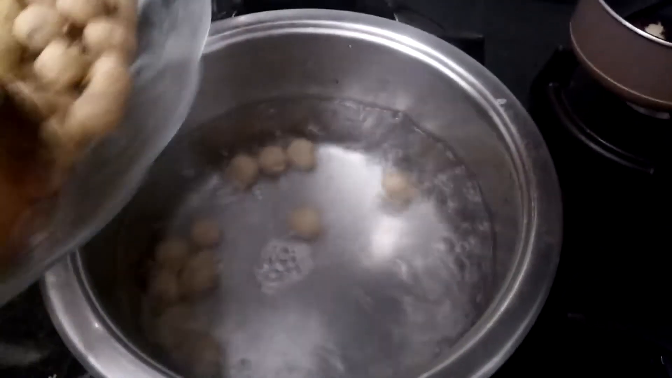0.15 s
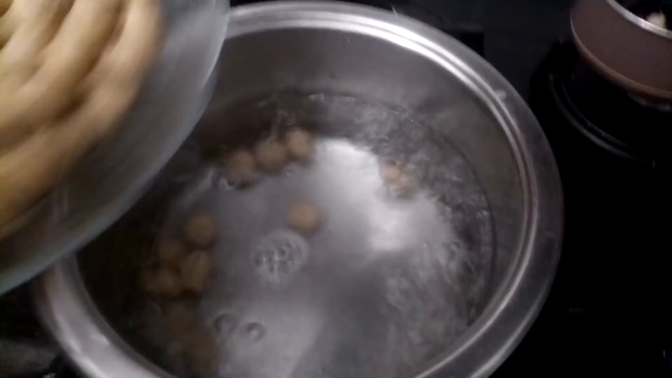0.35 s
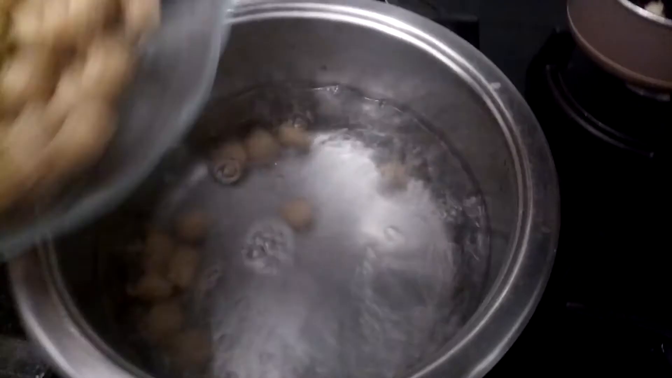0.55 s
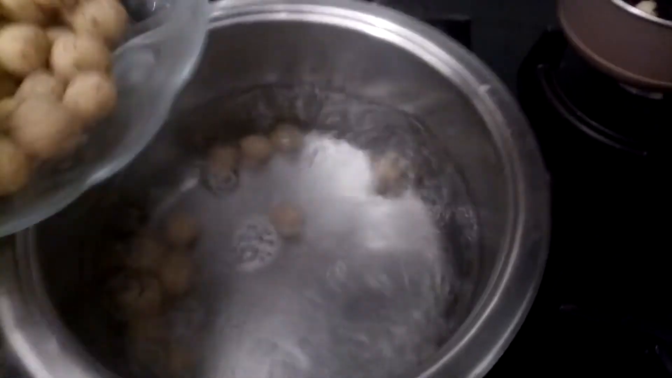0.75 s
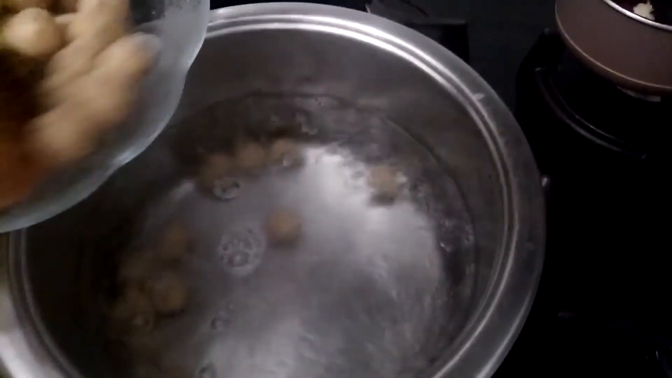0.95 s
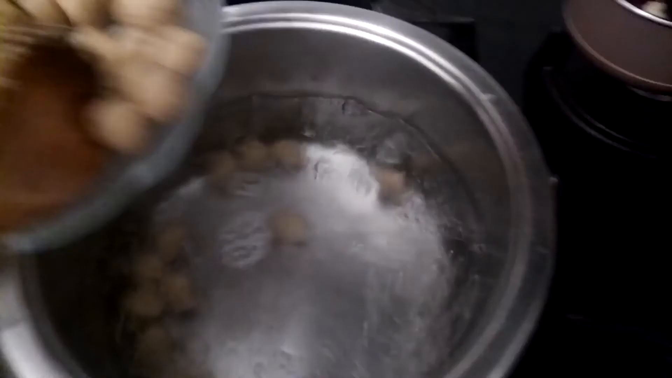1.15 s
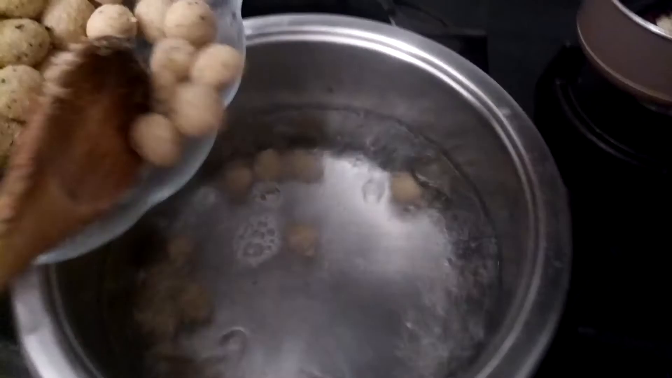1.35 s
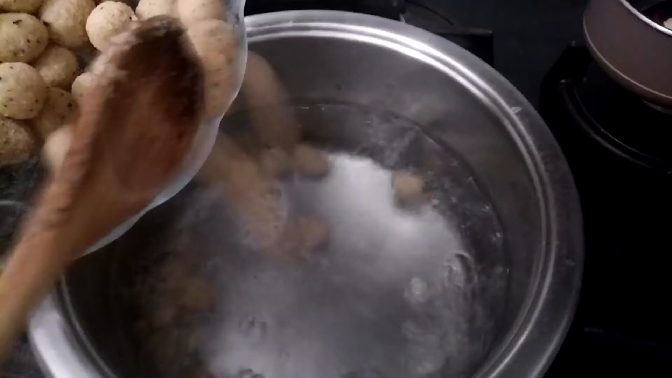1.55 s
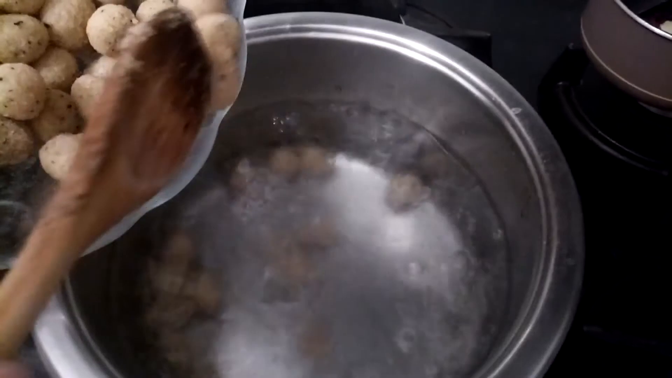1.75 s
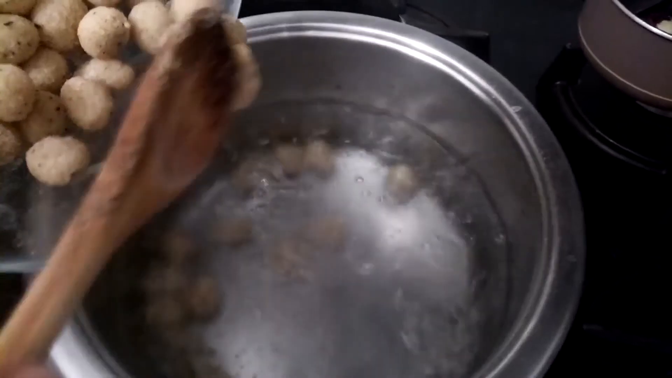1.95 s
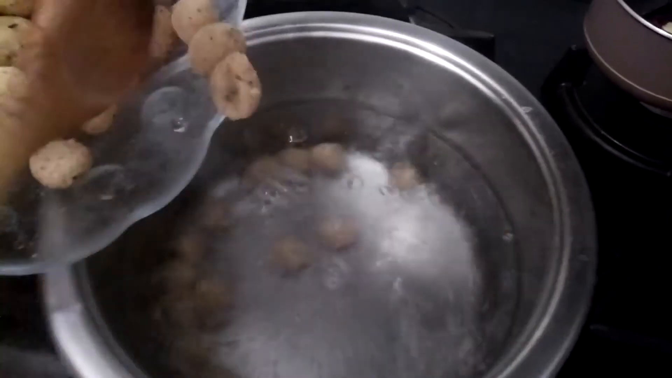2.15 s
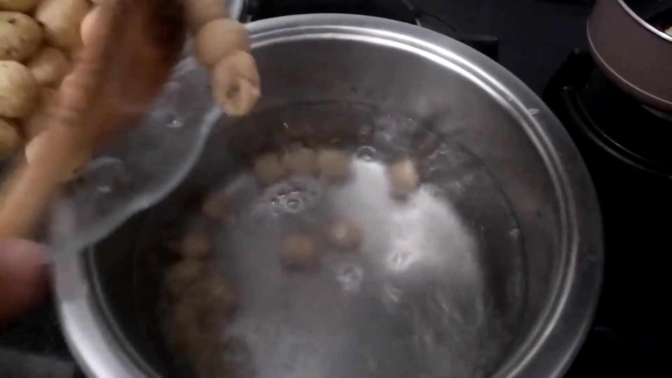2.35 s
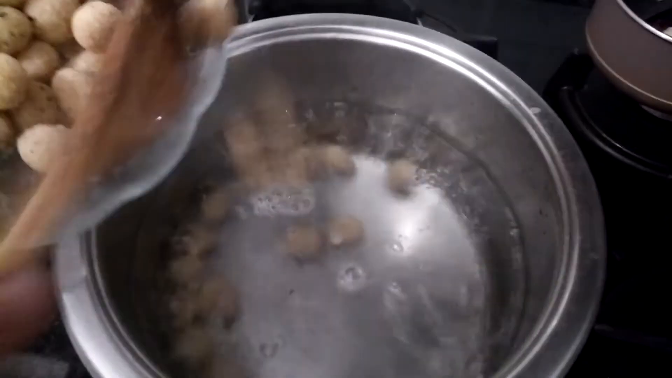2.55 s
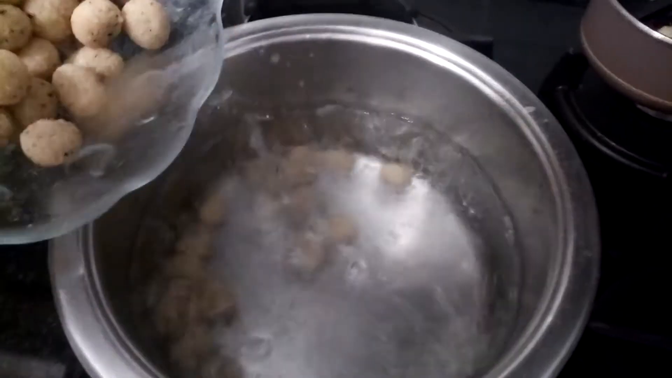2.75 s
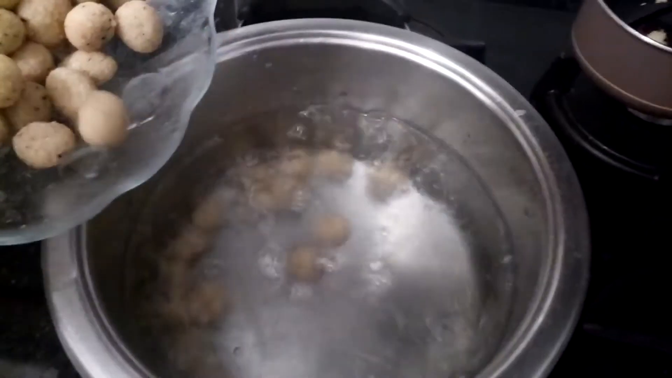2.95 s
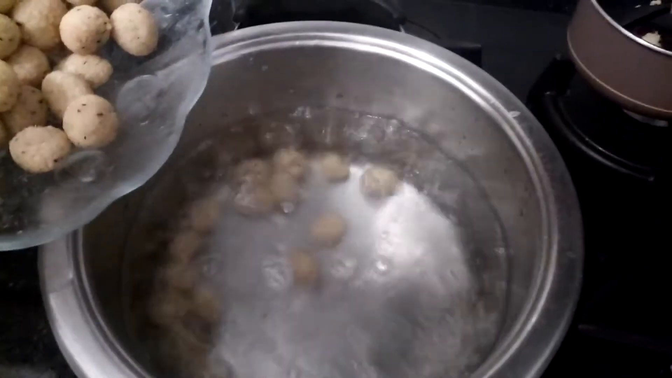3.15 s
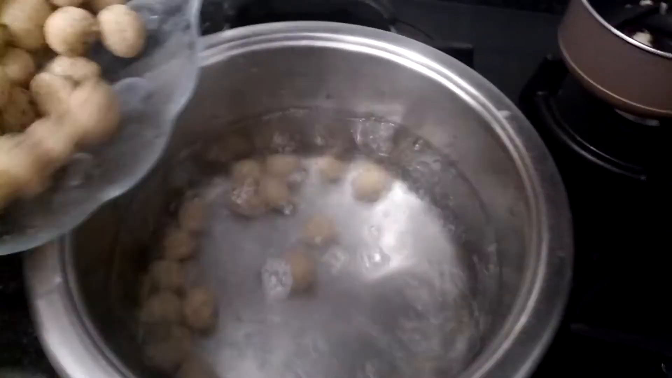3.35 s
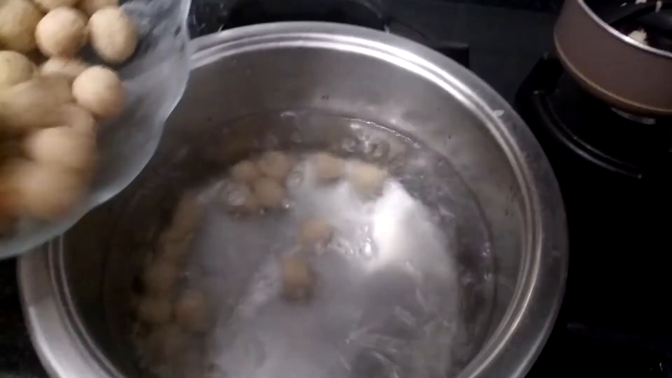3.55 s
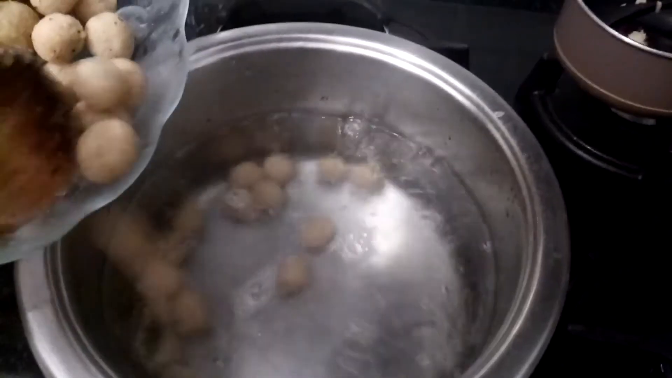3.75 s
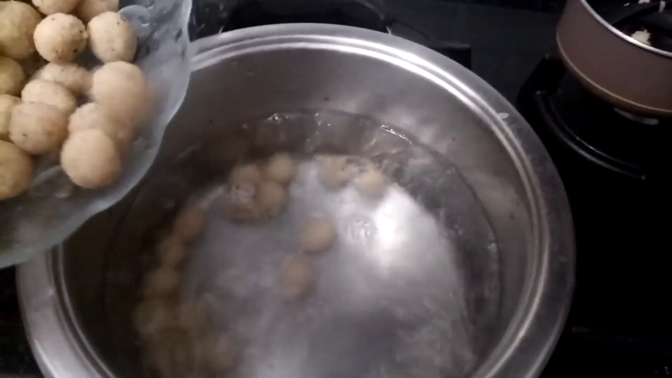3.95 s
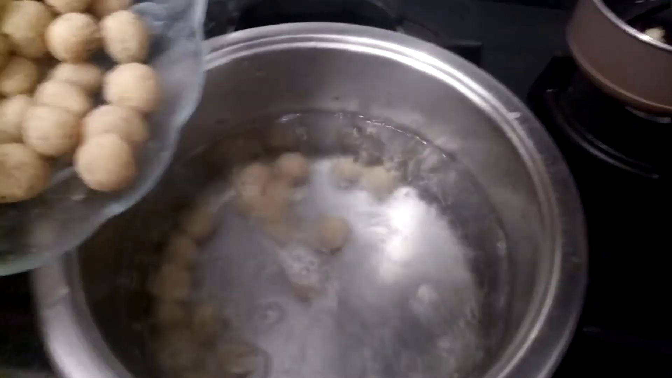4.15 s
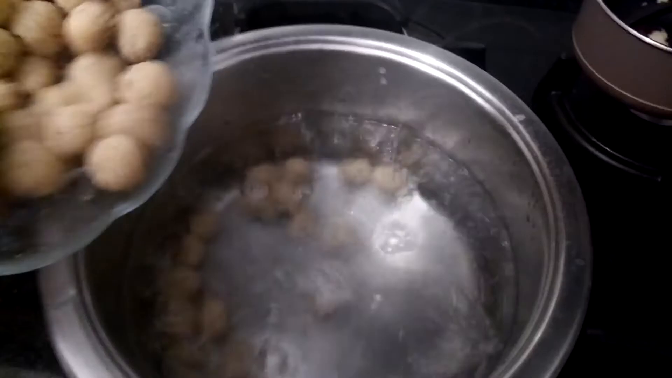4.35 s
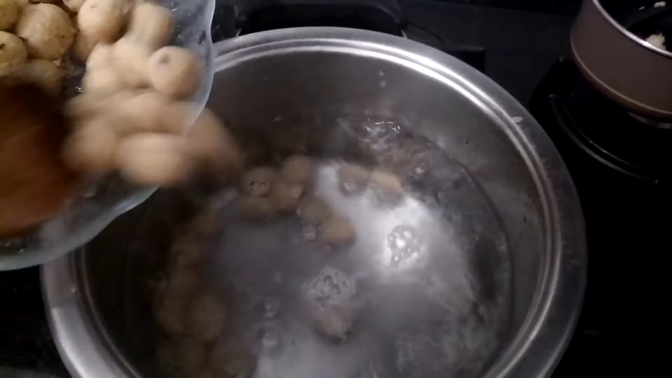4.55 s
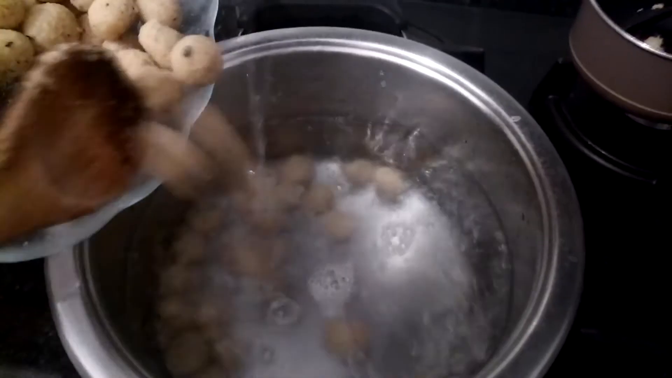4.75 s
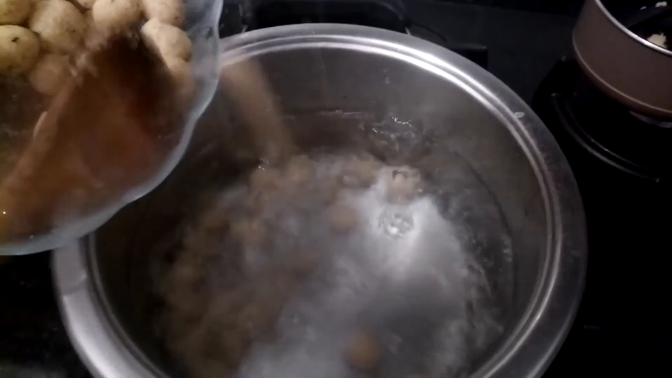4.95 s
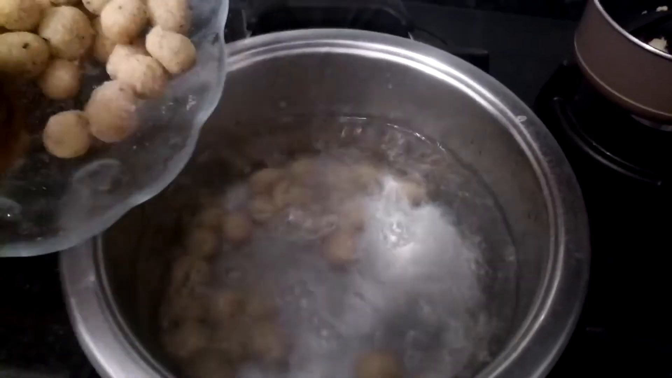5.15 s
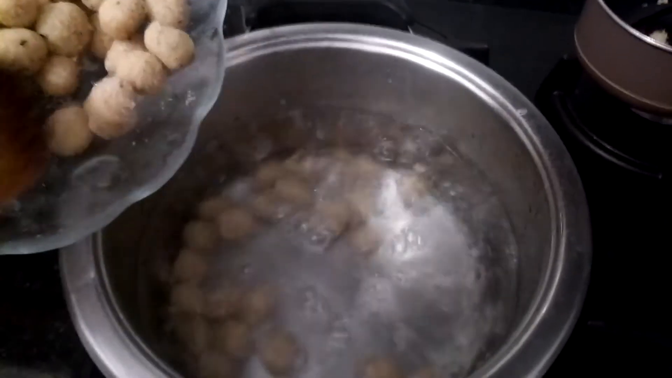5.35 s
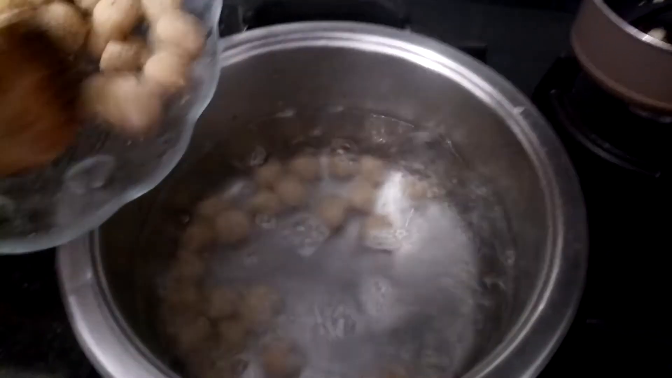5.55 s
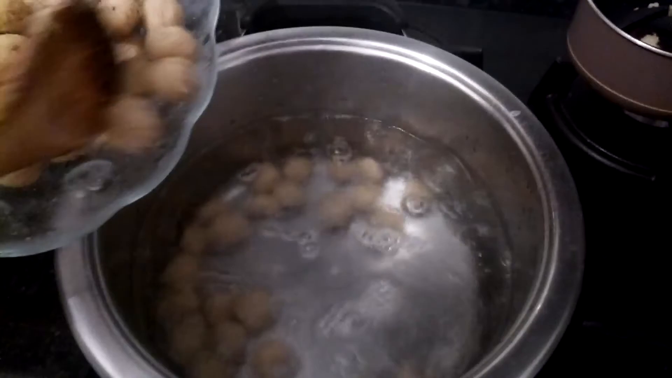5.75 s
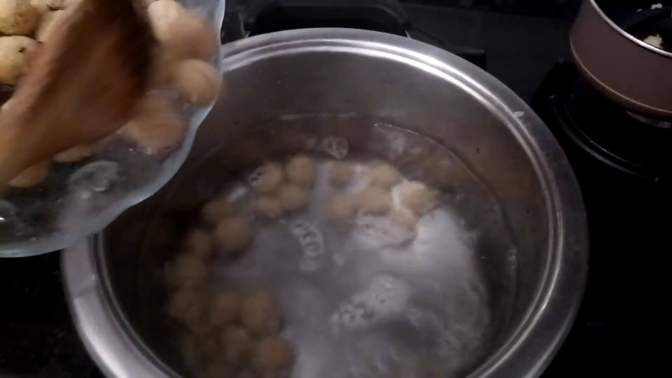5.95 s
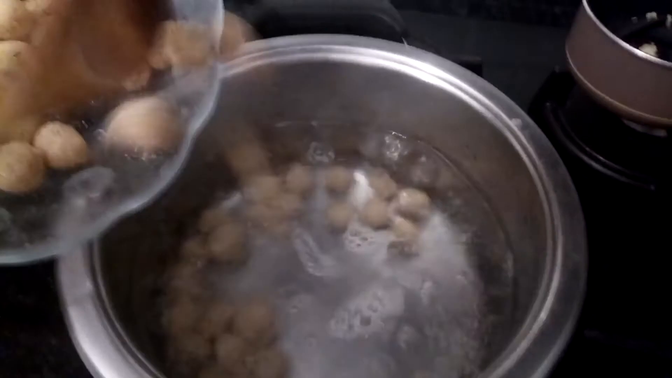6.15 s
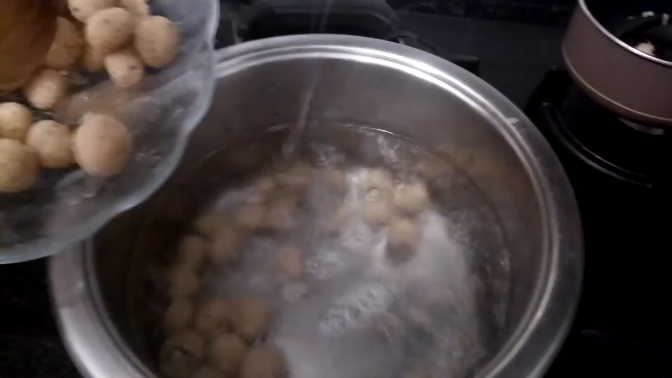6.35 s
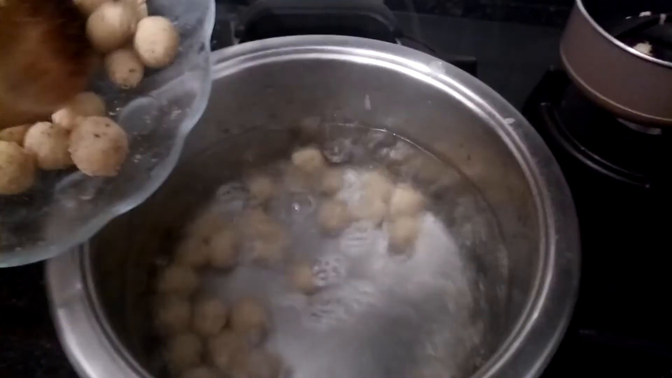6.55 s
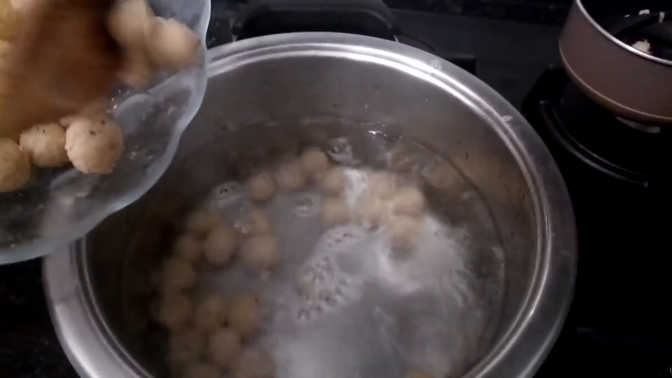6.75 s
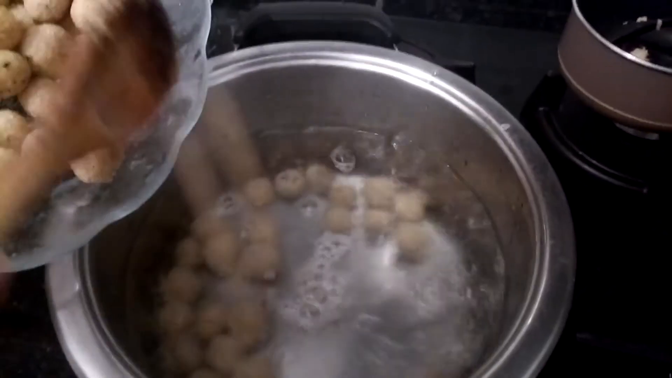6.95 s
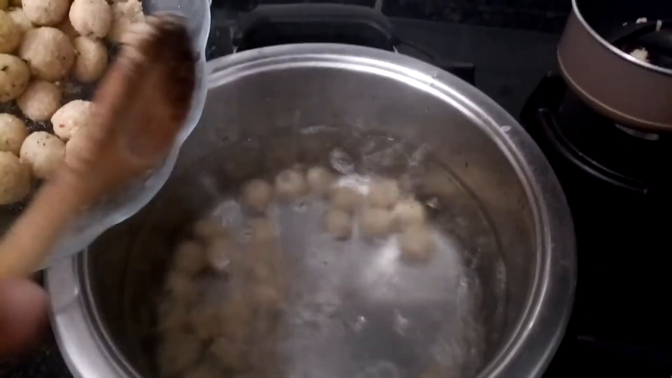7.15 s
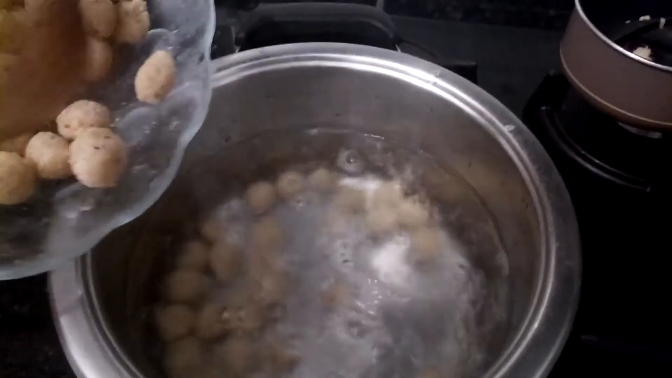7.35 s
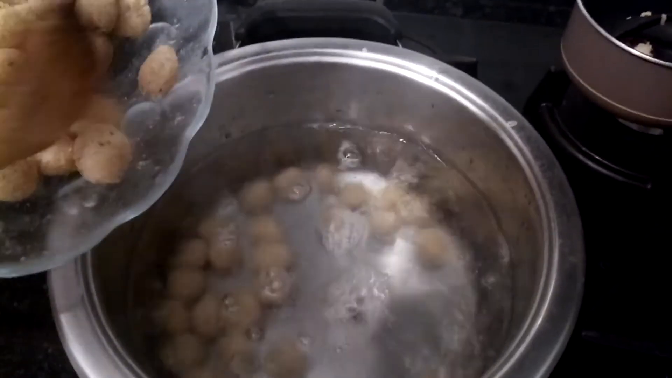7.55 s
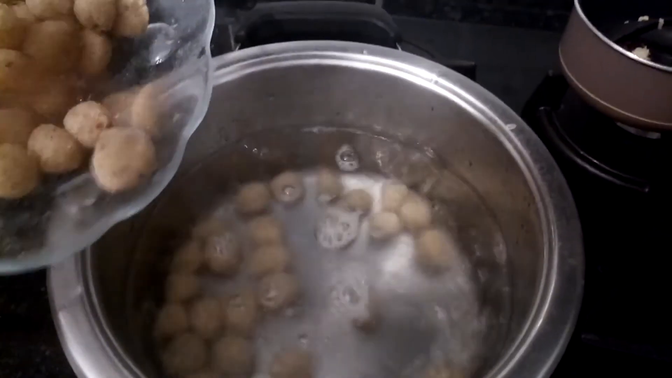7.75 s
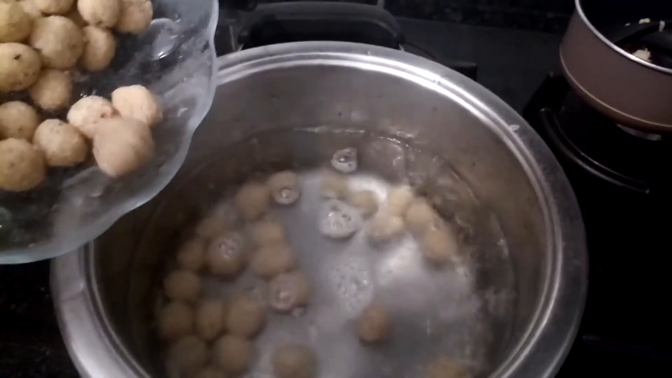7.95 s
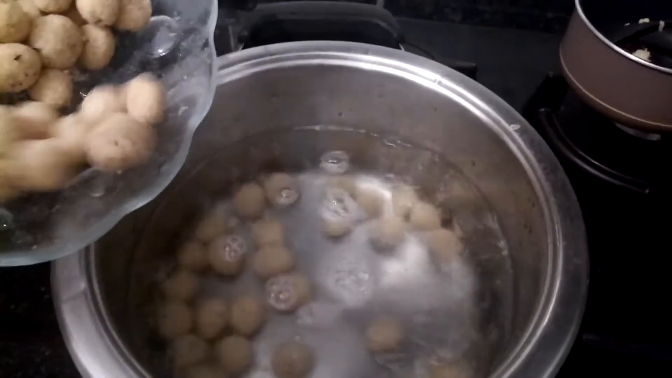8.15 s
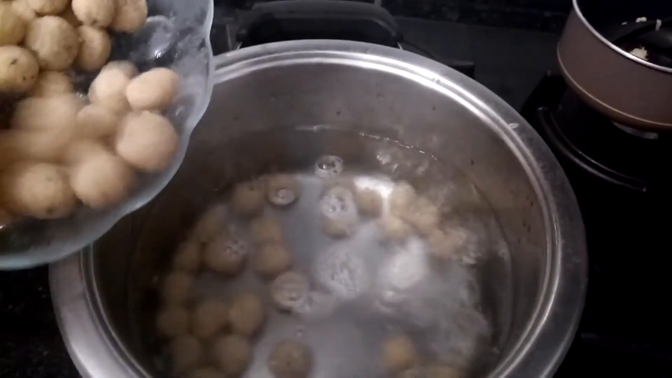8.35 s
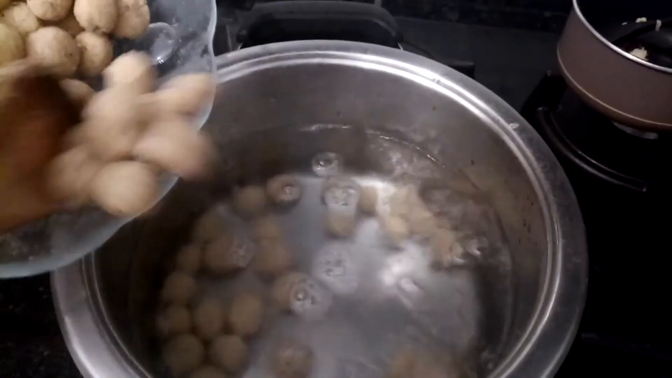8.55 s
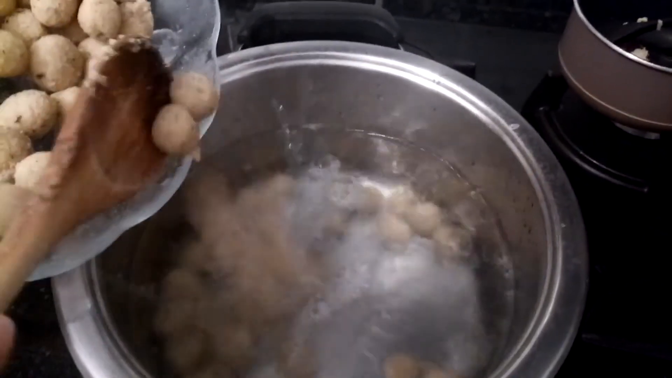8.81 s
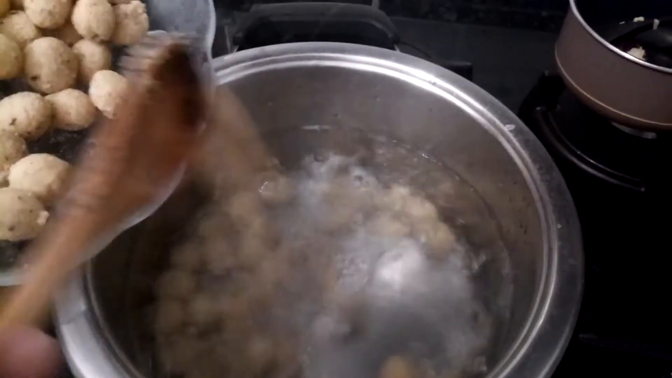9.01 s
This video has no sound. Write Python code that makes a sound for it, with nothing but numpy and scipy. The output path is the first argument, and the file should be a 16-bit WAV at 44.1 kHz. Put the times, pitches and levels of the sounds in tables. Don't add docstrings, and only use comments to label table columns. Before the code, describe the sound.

Close mono sound of balls pushed from a glass bowl into hot water. Two dull, briefly ringing spoon knocks come first, then two crisp splashes and another knock. After a pause, softer plops lead to a rapid run of slaps, then isolated splashes and a loud final one. Fine spray and droplets follow the hits, faint handling rumble sits below, and an even burner hiss fills the small reflective kitchen.

```python
import sys
import numpy as np
from scipy import signal
from scipy.fft import rfft, irfft
from scipy.io import wavfile
from scipy.ndimage import uniform_filter1d

SR = 44100
rng = np.random.default_rng(int(sys.argv[2]) if len(sys.argv) > 2 else 0)


def amplitude_ratio(level_db):
    exponent = np.asarray(level_db, float) / 20
    return 10 ** exponent


def persist_wave(psi):
    counts = np.round(np.clip(psi, -1, 1) * 32767).astype(np.int16)
    wavfile.write(sys.argv[1], SR, np.atleast_2d(counts).T)


N = 398223


def evened(x):
    return x / np.sqrt(np.mean(x ** 2) + 1e-20)


def read(points, hz):
    point_hz, value = np.transpose(points)
    return np.interp(np.log(hz + 1), np.log(point_hz + 1), value)


def placed(events, voice):
    track = np.zeros(N)
    for start_s, *row in events:
        sound = voice(*row)
        part = track[round(start_s * SR):][:len(sound)]
        part += sound[:len(part)]
    return track


def coloured(gain, size):
    white = rfft(rng.standard_normal(size))
    return evened(irfft(white * gain(np.fft.rfftfreq(size, 1 / SR)), size))


def click(gain, size):
    cepstrum = irfft(np.log(gain(np.fft.rfftfreq(size, 1 / SR)) + 1e-5), size)
    cepstrum[1:size // 2] *= 2
    cepstrum[size // 2 + 1:] = 0
    pulse = irfft(np.exp(rfft(cepstrum)), size)
    return pulse / abs(pulse).max()


def splash(slap_db, slap_hz, t60_s, churn_db, spray_db, sharp=True):
    # hz, db_per_hz
    spray_colour = [(200, -60), (500, 4.5), (1000, 6.5), (1700, 5), (2300, -5.5), (3000, -1.5),
                    (3700, -2.5), (5200, 0), (7000, -2.5), (8500, -8), (11500, -7.5), (13800, -2),
                    (15200, 13), (16500, -5.5)]
    # hz, width_hz, level_db
    pot_modes = [(2850, 300, -13.5), (3700, 270, -1), (4630, 350, 1.5), (5560, 360, 2), (6680, 790, -3)]
    t = np.arange(9000) / SR

    def water(hz):
        return amplitude_ratio(read(spray_colour, hz))

    def bulk(hz):
        pot = 0.57 + sum(amplitude_ratio(db) / (1 + (2 * (hz - f) / w) ** 2) for f, w, db in pot_modes)
        return water(hz) * pot / (1 + (hz / max(7800, 1.2 * slap_hz)) ** 10)

    def lean(hz):
        return 0.44 + 1 / (1 + ((hz - slap_hz) / 400) ** 2)

    def struck(hz):
        return bulk(hz) * lean(hz) / (1 + (2400 / (hz + 1)) ** 6)

    def stirred(hz):
        return bulk(hz) * np.sqrt(lean(hz))

    def fine(hz):
        return water(hz) / (1 + (8000 / (hz + 1)) ** 8)

    drops_per_s = 600
    drops = amplitude_ratio(3.5 * np.minimum(rng.exponential(1, len(t)), 3)) * (rng.random(len(t)) < drops_per_s / SR)
    patter = 0.65 + 0.35 * evened(uniform_filter1d(drops, size=60))

    rise_s = 0.0005 if sharp else 0.003
    rise = np.minimum(t / rise_s, 1)
    fade = amplitude_ratio(-60 * t / np.clip(t60_s, 0.006, 0.2))

    hardness = sharp * np.clip(0.017 / t60_s, 0, 1)
    snap = hardness * np.roll(click(struck, len(t)), 20) * amplitude_ratio(-60 * t / 0.052)
    crack = (0.3 if sharp else 0.6) * rise * fade * coloured(struck, len(t))
    churn = amplitude_ratio(churn_db - 60 * t / 0.46) * rise * patter * coloured(stirred, len(t))

    burst = amplitude_ratio(-60 * t / 0.035) + 0.3 * patter * amplitude_ratio(-60 * t / 0.38)
    spray = rise * burst * coloured(fine, len(t))
    ending = np.cos(np.pi / 2 * t / t[-1])
    return ending * (amplitude_ratio(slap_db + 2) * (snap + crack + churn) + amplitude_ratio(spray_db - 2.5) * spray)


def ball_slaps():
    # start_s, slap_peak_db, slap_hz, slap_t60_s, spray_db
    ball_rows = [(1.518, -24, 5830, 0.026, -36), (2.5093, -21, 4740, 0.021, -31),
                 (3.7251, -35, 4860, 0.035, -42.5), (4.080, -37, 3750, 0.0065, -42),
                 (4.584, -26, 3700, 0.017, -55), (4.660, -31, 4600, 0.024, -50),
                 (4.7523, -33, 3500, .04, -47), (4.8118, -28, 5000, 0.043, -44),
                 (4.956, -22.5, 3870, 0.022, -34), (6.0993, -22, 4600, 0.016, -32),
                 (6.9518, -24, 4800, 0.019, -42), (8.7259, -34, 5100, 0.028, -33),
                 (8.777, -17, 4360, 0.0091, -34)]
    # start_s, level_db, slap_hz, t60_s
    touch_rows = [(2.507, -31, 4580, 0.013), (4.081, -41, 6000, 0.013), (4.0813, -30, 7800, 0.038),
                  (4.584, -28, 5700, 0.026), (4.959, -35, 5060, 0.012), (6.9481, -24.5, 3500, 0.027),
                  (8.7695, -40, 3500, 0.012), (8.7814, -33, 4900, .01), (8.779, -32, 4500, .01),
                  (8.783, -28.5, 5100, 0.028), (3.7247, -32, 2490, 0.027), (4.659, -33, 2850, 0.084),
                  (4.830, -38, 2600, .02), (6.962, -39, 4950, 0.12), (8.841, -50, 5000, .035),
                  (8.786, -37, 4500, .14), (8.786, -40, 2800, .1), (6.102, -40, 5000, .06)]
    touch_spray_db = -60

    def slap(slap_db, slap_hz, t60_s, spray_db):
        churn_db = min(-24.5 + 7.5 * np.log2(t60_s / 0.026), -24)
        return splash(slap_db, slap_hz, t60_s, churn_db, spray_db)

    return placed(ball_rows + [(*row, touch_spray_db) for row in touch_rows], slap)


def falling_droplets():
    # start_s, level_db, slap_hz, spray_db
    droplet_rows = [(1.459, -45, 3970, -39), (1.557, -37, 4000, -35), (2.438, -42, 3950, -36),
                    (2.659, -66, 4300, -46), (4.027, -56, 5530, -48), (4.522, -46, 4900, -43),
                    (4.604, -48, 4650, -50), (4.701, -52, 5000, -47), (4.774, -42, 4460, -45),
                    (4.86, -42, 4500, -50), (4.897, -44, 6060, -47), (6.044, -48, 5100, -47),
                    (6.148, -51, 4200, -45), (6.201, -45.5, 4800, -44), (6.888, -46, 4450, -47),
                    (8.596, -51, 5500, -45), (8.614, -42.5, 4360, -45), (8.654, -45, 3980, -48),
                    (8.657, -46, 5000, -42), (8.669, -41, 4600, -37.5), (8.8173, -39.5, 5500, -31),
                    (8.993, -50, 5000, -51), (9.005, -43, 3750, -40), (2.44, -38, 6200, -52),
                    (4.526, -48, 3500, -48)]

    def droplet(level_db, slap_hz, spray_db):
        return splash(level_db, slap_hz, 0.044, -24, spray_db, sharp=False)

    return placed(droplet_rows, droplet)


def bubble(level_db, pitch_hz, t60_s, climb):
    t = np.arange(7000) / SR
    tone = np.sin(2 * np.pi * pitch_hz * t * (1 + climb / t60_s * t))
    return amplitude_ratio(level_db - 60 * t / t60_s) * np.minimum(t / 0.00061, 1) * tone


def air_plops():
    # start_s, level_db, pitch_hz, t60_s
    plop_rows = [(1.518, -27.5, 980, 0.0086), (1.555, -33.5, 890, 0.014), (1.556, -45.5, 500, 0.047),
                 (2.442, -41, 1290, 0.017), (2.509, -24.5, 930, 0.0083), (2.5087, -29, 1530, 0.012),
                 (2.5097, -31, 2050, 0.015), (3.7249, -27.5, 940, 0.0096), (4.081, -46, 840, 0.032),
                 (4.5834, -27, 880, 0.012), (4.6605, -40, 490, 0.06), (4.660, -34, 980, 0.01),
                 (4.7515, -28.5, 1200, 0.011), (4.811, -31.5, 876, 0.032), (4.8135, -39, 480, 0.045),
                 (4.845, -46, 800, 0.07), (4.9557, -30, 980, 0.012), (4.956, -39, 480, 0.037),
                 (6.0985, -30, 880, 0.014), (6.9485, -29.5, 950, 0.013), (6.951, -36, 610, 0.019),
                 (8.7765, -34, 980, 0.022), (8.235, -62, 693, 0.15), (8.671, -42, 1250, 0.012),
                 (8.653, -48, 1200, .02), (6.195, -48, 1300, .03), (6.983, -47, 1500, .04),
                 (8.728, -54, 1510, .03), (8.818, -49, 457, .04), (9.005, -47, 1480, 0.025),
                 (8.818, -50, 1010, 0.027)]
    return placed(plop_rows, lambda *row: bubble(*row, climb=0.099))


def bubble_pings():
    # start_s, level_db, pitch_hz, t60_s
    ping_rows = [(4.0802, -31, 3750, 0.02), (4.0812, -35, 5900, 0.024), (4.0812, -36, 7500, .03),
                 (4.584, -32, 3700, .015), (4.584, -34, 5700, .015), (4.9562, -31, 3750, .015),
                 (4.9562, -31, 5660, .015), (8.7262, -34, 5100, .02), (8.7702, -29, 3800, .007),
                 (8.7822, -31, 4900, .012), (8.7785, -27, 3900, .008), (4.863, -42, 4800, .012),
                 (4.862, -50, 3000, .012), (4.525, -50, 5400, .015), (8.7772, -27, 4470, .02),
                 (4.6605, -50, 325, 0.063), (4.662, -47, 240, .08), (4.663, -47, 2850, .08),
                 (8.786, -45, 2850, .08), (8.672, -39, 3500, .013), (8.669, -41, 4600, .025),
                 (8.672, -42, 5700, .02), (8.656, -44, 4100, .03), (8.7262, -46, 2400, .015),
                 (8.7265, -43, 4000, .02), (8.7788, -25, 4500, .006), (8.7803, -31, 4400, .006),
                 (4.5848, -30, 4700, .01), (4.5848, -35, 6700, .012), (4.6605, -34, 5600, .03),
                 (4.6605, -36, 3600, .015), (4.8118, -36, 3500, .015), (4.9562, -30, 4700, .015),
                 (2.4425, -40, 3700, .015), (3.73, -42, 5400, .04), (1.557, -41, 3800, .015),
                 (8.818, -45, 5550, .025), (6.9515, -33, 3300, .02), (6.957, -37, 5500, .02),
                 (6.195, -46, 4300, .02), (8.7705, -36, 2900, .01)]
    return placed(ping_rows, lambda *row: bubble(*row, climb=0.01))


def sheet(level_db, centre_hz, width_hz, t60_s):
    t = np.arange(12000) / SR
    grain = amplitude_ratio(2.5 * evened(uniform_filter1d(rng.standard_normal(len(t)), size=90)))
    band = coloured(lambda hz: 1 / (1 + (2 * (hz - centre_hz) / width_hz) ** 4), len(t))
    shape = np.minimum(t / 0.002, 1) * np.cos(np.pi / 2 * t / t[-1])
    return amplitude_ratio(level_db - 60 * t / t60_s) * shape * grain * band


def thrown_sheets():
    # start_s, level_db, centre_hz, width_hz, t60_s
    sheet_rows = [(6.962, -46, 5200, 1400, .45), (6.96, -56, 750, 500, .3), (4.660, -37, 15100, 900, .05),
                  (4.752, -43, 15000, 1200, .08), (4.584, -54, 9300, 1800, .06),
                  (4.604, -56, 13600, 1200, .04), (6.103, -56, 800, 700, .15), (6.1, -44, 7400, 600, .04),
                  (8.785, -44.5, 4600, 1400, .25), (8.727, -47, 5300, 500, .12),
                  (8.863, -52, 1400, 500, .12), (8.73, -54, 1200, 900, .1), (1.09, -55, 1100, 900, .25),
                  (0.47, -53, 1400, 900, .25), (3.73, -54, 1500, 600, .3), (5.45, -60, 1580, 150, .9),
                  (3.25, -70, 250, 90, .9), (1.5185, -32, 15200, 900, .045), (4.59, -51, 6200, 1800, .35),
                  (4.815, -48, 6200, 2000, .15), (4.085, -53, 7300, 900, .3), (4.956, -57, 12800, 2500, .3),
                  (2.52, -59, 700, 500, .4), (5.5, -60, 85, 50, .4), (0.55, -62, 5000, 60, 3),
                  (0.75, -61, 5000, 60, 3), (0.92, -61, 5000, 60, 2), (1.525, -50, 4800, 2500, .3),
                  (5.64, -68, 55, 40, .6), (4.6, -58, 2900, 500, .5), (4.82, -58, 2700, 700, .3)]
    return placed(sheet_rows, sheet)


def knock(tick_db, modes):
    t = np.arange(14000) / SR
    wander = evened(uniform_filter1d(rng.standard_normal((len(modes), len(t))), size=350))
    waver = 1 + 0.98 * np.minimum(t / 0.039, 1) * wander
    ring = np.zeros(len(t))
    for swing, (mode_hz, mode_db, t60_s) in zip(waver, modes):
        ring += swing * amplitude_ratio(mode_db - 60 * t / t60_s) * np.sin(2 * np.pi * mode_hz * t)
    wood = coloured(lambda hz: 1 / (1 + (hz / 2000) ** 2) * (hz > 500), len(t))
    tick = amplitude_ratio(tick_db - 60 * t / 0.044) * wood
    return np.minimum(t / 0.0004, 1) * (ring + tick)


def spoon_on_bowl():
    # (mode_hz, level_db, t60_s)
    strike_rows = [
        (0.463, -40.5, [(554, -44, 0.055), (1103, -49, 0.21), (1125, -29.5, 0.045), (1480, -33, 0.035), (1748, -45, 0.19), (1782, -31.5, 0.06), (2560, -48, 0.11), (3070, -47, 0.12), (3457, -31, 0.036), (4380, -48, 0.12), (4920, -58, .3), (5640, -47, 0.04)]),
        (1.0798, -49, [(214, -51, 0.11), (572, -44, 0.056), (834, -35, 0.055), (1133, -35, 0.036), (1555, -34, 0.045), (2455, -48, 0.081), (3500, -49, 0.067)]),
        (1.0875, -61, [(1740, -47.5, 0.12), (2710, -41.5, 0.076), (2657, -46, 0.08)]),
        (2.8880, -45, [(1085, -52.5, 0.43), (1490, -33.5, 0.024), (1776, -35, 0.051), (1820, -46, 0.2), (2280, -47, 0.056), (2555, -60, 0.3), (3050, -48.5, 0.076), (3400, -36, 0.025), (4410, -48, 0.04)]),
    ]
    # (mode_hz, level_db, t60_s)
    bounce_rows = [
        (0.486, -60, [(1110, -46, .2), (1790, -46, .07)]),
        (0.503, -62, [(1790, -43, .1), (1120, -49, .15)]),
        (1.113, -62, [(2650, -54, .03), (1650, -50, .06)]),
    ]
    return placed(strike_rows + bounce_rows, knock)


def kitchen(x):
    # hz, t60_s
    decay_points = [(300, 1), (800, 0.49), (2100, 0.36), (5500, 0.23), (15000, 0.65)]
    taps = np.zeros(SR // 2)
    at = np.arange(120, len(taps) - 20, 20)
    taps[at + rng.integers(0, 20, len(at))] = rng.choice([-1., 1.], len(at))
    hz, t, bins = signal.stft(taps, SR, nperseg=256)
    fade = amplitude_ratio(-60 * t / read(decay_points, hz)[:, None])
    tail = signal.istft(bins * fade, SR, nperseg=256)[1]
    return signal.oaconvolve(x, tail / np.linalg.norm(tail))[:N]


def hiss():
    # hz, width_hz, level_db
    hiss_modes = [(495, 53, -8), (590, 46, -10), (1182, 297, -4), (1394, 183, 0), (1562, 113, -0.5),
                  (1835, 296, -7), (2100, 200, -8), (2600, 320, -13), (3376, 370, -8), (3500, 84, -3),
                  (3750, 560, -8), (4300, 315, -3.5), (4650, 650, -7.5), (5100, 410, -2.5),
                  (5480, 330, -1.5), (5700, 250, -20), (6850, 720, -16), (8550, 74, -24), (10150, 230, -20),
                  (10750, 140, -25), (11200, 70, -40), (12900, 110, -14), (12560, 240, -19),
                  (15800, 550, -41.5), (14800, 660, -7.5), (15940, 980, -5.5), (15600, 230, -31)]
    # hz, db_per_hz
    hiss_bed = [(20, -36), (120, -16.5), (400, -13.5), (900, -17.5), (2300, -17), (2900, -17.5),
                (7200, -13.5), (8000, -33.5), (9500, -38.5), (11500, -37.5), (12300, -32), (14000, -34),
                (16000, -17.5)]
    level_db, sag_db_per_s = -53.5, 0.06
    fizz_hz, fizz_start_db, fizz_sag_db_per_s = 12100, 2, 0.4
    patchy_db, swell_db, ripple = 1.61, 0.5, 0.64

    frame_count, hz = N // 512 + 6, np.fft.rfftfreq(2048, 1 / SR)
    real, imag, patches = rng.standard_normal((frame_count, 1025, 3)).T
    patches = uniform_filter1d(patches, size=16, axis=0)
    patches = evened(uniform_filter1d(patches, size=6, axis=1))
    swell = evened(uniform_filter1d(rng.standard_normal(frame_count), size=8))

    density = amplitude_ratio(2 * read(hiss_bed, hz))
    for mode_hz, width_hz, mode_db in hiss_modes:
        density = density + amplitude_ratio(2 * mode_db) / (1 + (2 * (hz - mode_hz) / width_hz) ** 2) ** 2
    bins = (real + 1j * imag) * np.sqrt(density)[:, None] * amplitude_ratio(patchy_db * patches + swell_db * swell)

    fizz_share = 1 / (1 + (fizz_hz / (hz + 1)) ** 10)
    fizz_db = fizz_start_db - fizz_sag_db_per_s * np.arange(frame_count) * 512 / SR
    bins *= amplitude_ratio(np.outer(fizz_share, fizz_db))

    jets = evened(signal.istft(bins, nperseg=2048, noverlap=1536)[1][:N])
    sagging = amplitude_ratio(level_db - sag_db_per_s * np.arange(N) / SR)
    return sagging * evened(jets + ripple * kitchen(jets))


def rumble():
    # hz, db_per_hz
    rumble_colour = [(20, -42), (32, -5), (45, 2), (90, 0.5), (122, 10.5), (160, -4), (230, 1), (330, -1.5),
                     (500, -65), (1000, -120)]
    # start_s, level_db, hold_s
    shove_rows = [(0.1, -78, .03), (0.68, -70, 0.021), (1.083, -68, .2), (1.51, -63, 0.22),
                  (2.09, -70, 0.13), (3.696, -71, 0.054), (1.92, -74, .03), (7.947, -77, 0.084),
                  (5.7, -80, .1), (3.997, -74, .03), (4.187, -74, 0.028), (4.75, -75, 0.36),
                  (5.52, -67, .05), (5.96, -79.5, 0.42), (6.6, -77, .04), (6.97, -71, 0.041),
                  (8.88, -77, 0.045)]
    traffic_db, rise_db_per_s, fall_db_per_s = -82, 260, 120
    t = np.arange(N) / SR
    swell = amplitude_ratio(traffic_db)
    for start_s, level_db, hold_s in shove_rows:
        before_s = np.maximum(start_s - t, 0)
        after_s = np.maximum(t - start_s - hold_s, 0)
        swell = swell + amplitude_ratio(level_db - rise_db_per_s * before_s - fall_db_per_s * after_s)
    return swell * coloured(lambda hz: amplitude_ratio(read(rumble_colour, hz)), N)


def scene():
    slaps = ball_slaps() + falling_droplets() + bubble_pings()
    plops = air_plops()
    bowl = spoon_on_bowl()
    echoes = kitchen(amplitude_ratio(-16.5) * slaps + amplitude_ratio(-7) * plops + amplitude_ratio(-8) * bowl)
    mono = slaps + thrown_sheets() + plops + bowl + echoes + hiss() + rumble()
    return np.array([mono, mono])


def roll_off(x):
    return signal.sosfilt(signal.butter(12, 16990, fs=SR, output="sos"), x)


def record(dry):
    def limited(edge_hz):
        taps = signal.firwin(2047, edge_hz, window=("kaiser", 10), fs=SR)
        return signal.oaconvolve(dry, taps[None], "same")

    narrow, wide = limited(15790), limited(16850)
    power_db = 10 * np.log10(abs(uniform_filter1d(dry[0] ** 2, size=200)) + 1e-12)
    opened = uniform_filter1d(np.clip((power_db + 34) / 3, 0, 1), size=100)
    return roll_off(narrow + amplitude_ratio(-15) * opened * (wide - narrow))


dry = scene()
out = record(dry)
persist_wave(out)
```